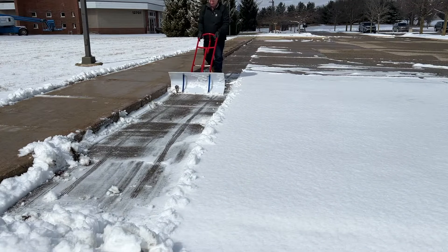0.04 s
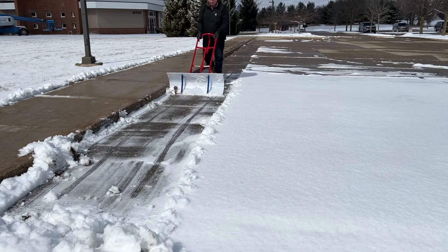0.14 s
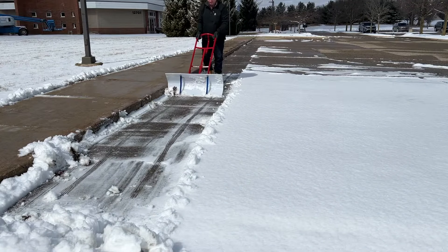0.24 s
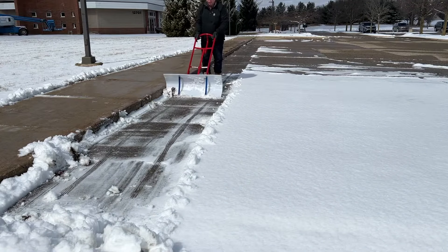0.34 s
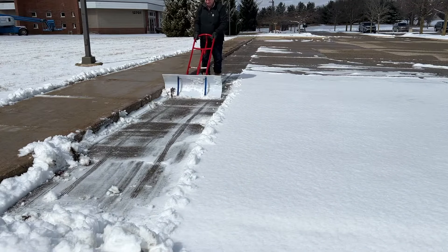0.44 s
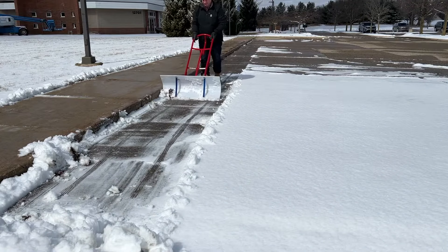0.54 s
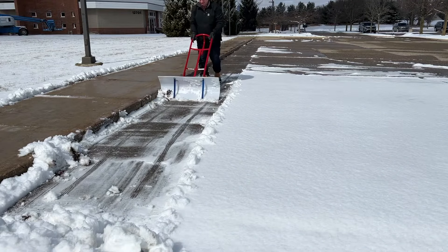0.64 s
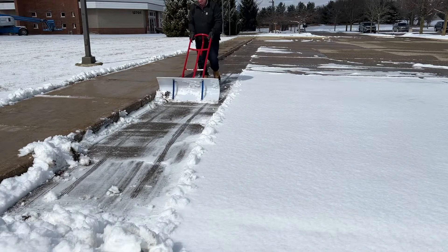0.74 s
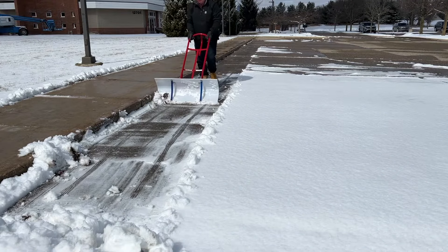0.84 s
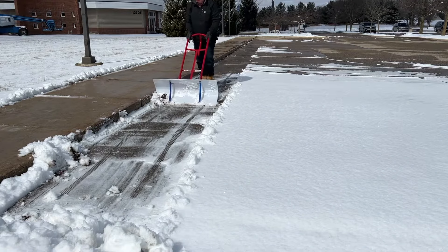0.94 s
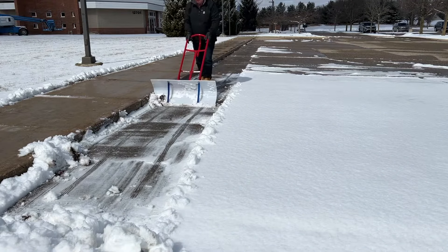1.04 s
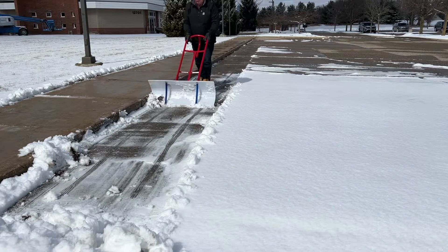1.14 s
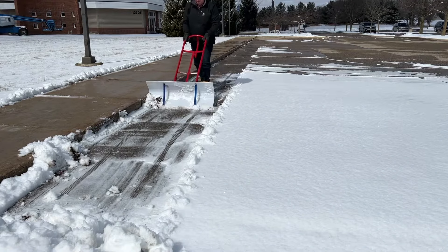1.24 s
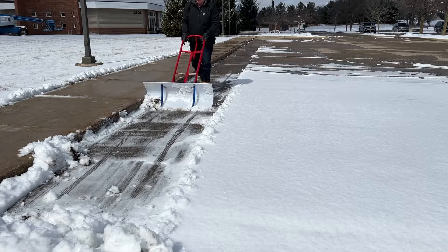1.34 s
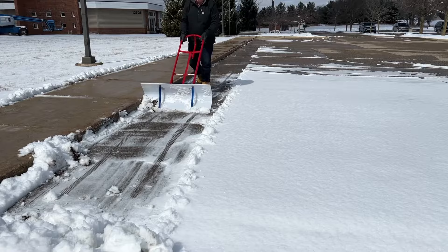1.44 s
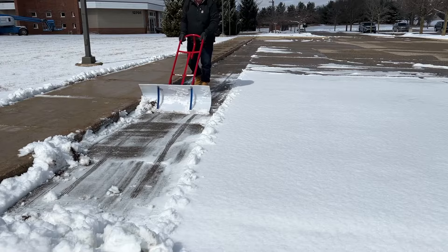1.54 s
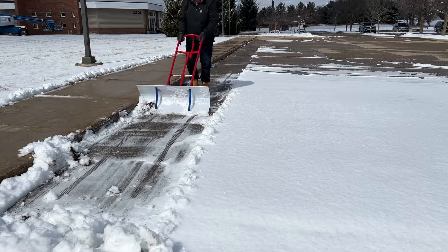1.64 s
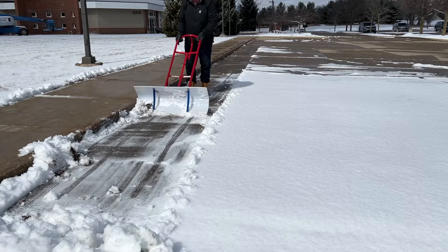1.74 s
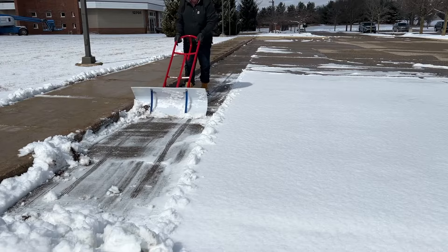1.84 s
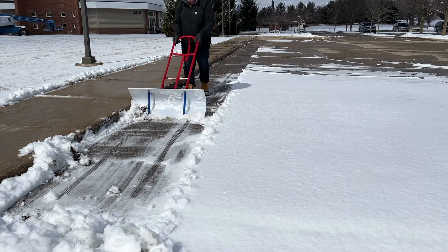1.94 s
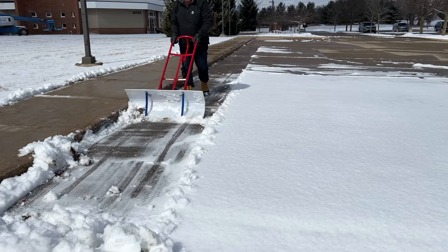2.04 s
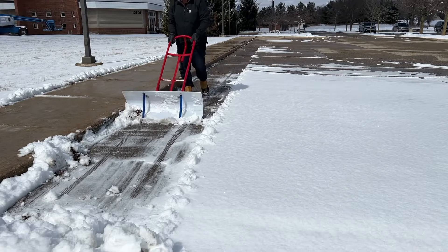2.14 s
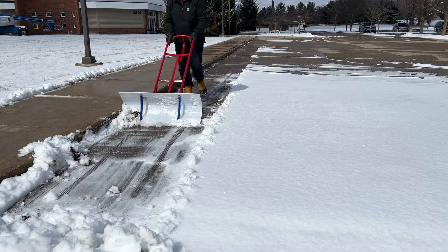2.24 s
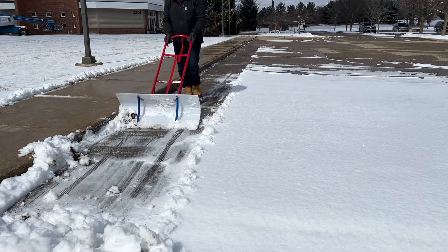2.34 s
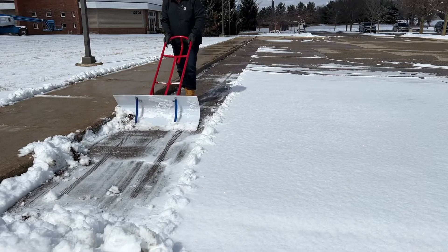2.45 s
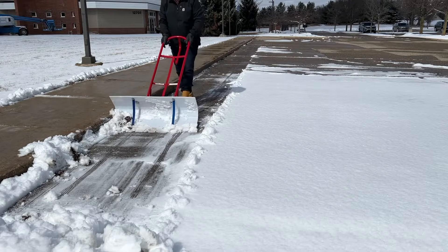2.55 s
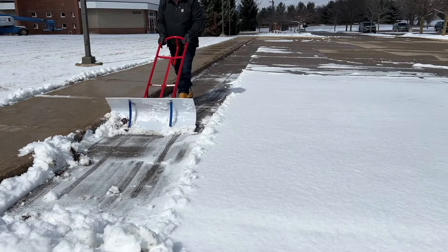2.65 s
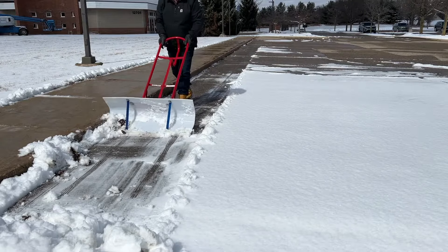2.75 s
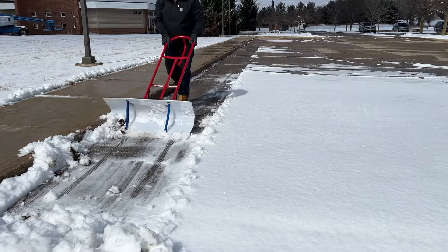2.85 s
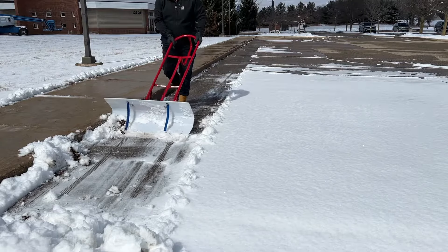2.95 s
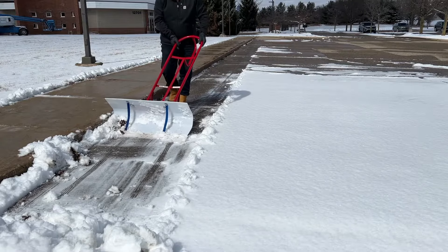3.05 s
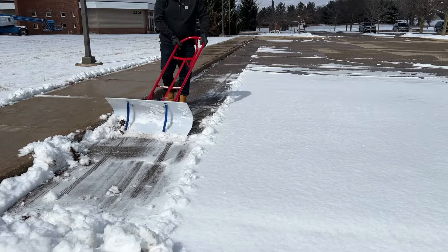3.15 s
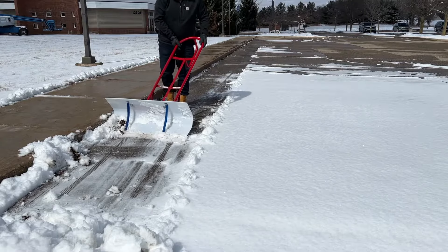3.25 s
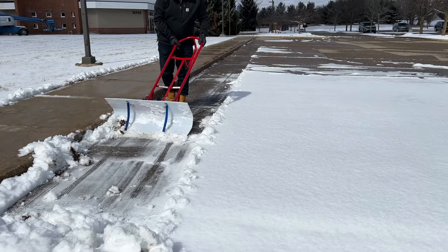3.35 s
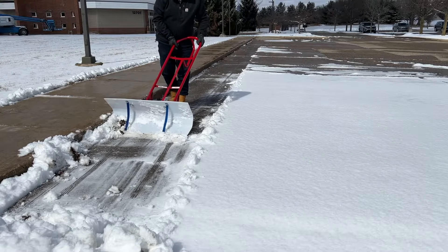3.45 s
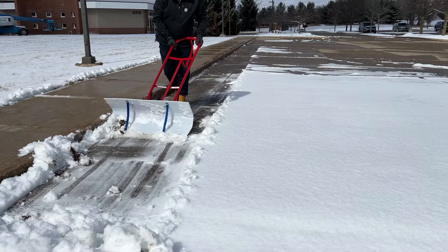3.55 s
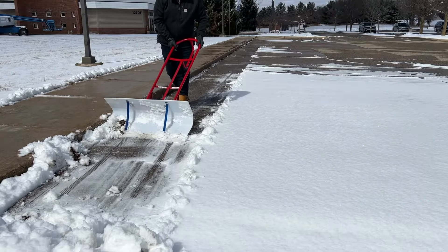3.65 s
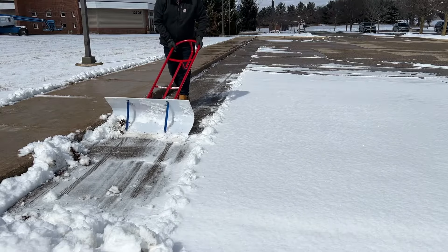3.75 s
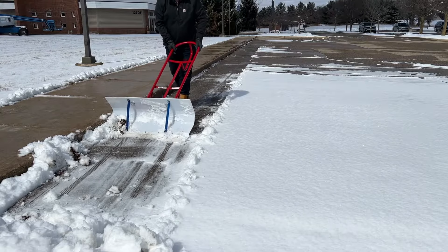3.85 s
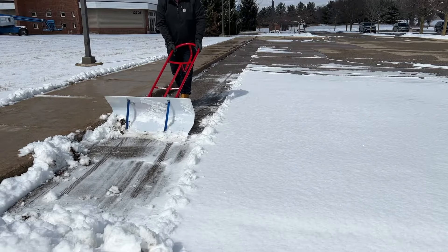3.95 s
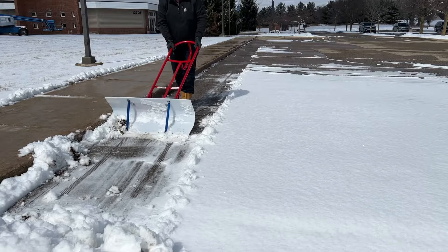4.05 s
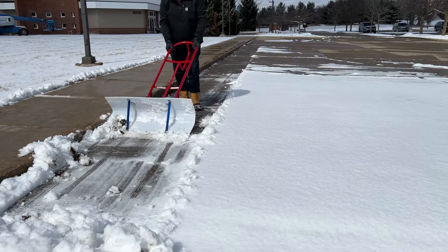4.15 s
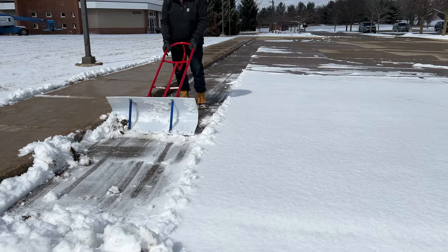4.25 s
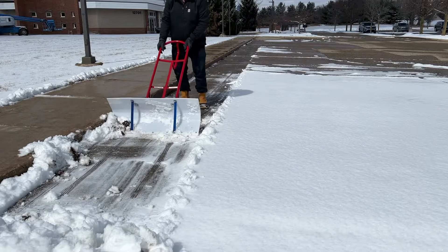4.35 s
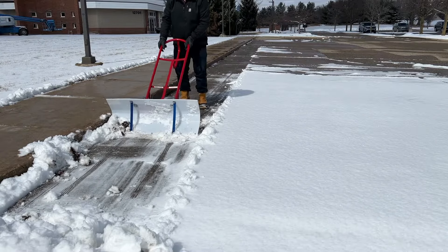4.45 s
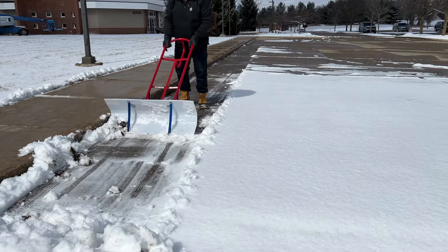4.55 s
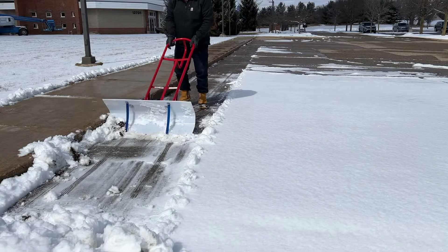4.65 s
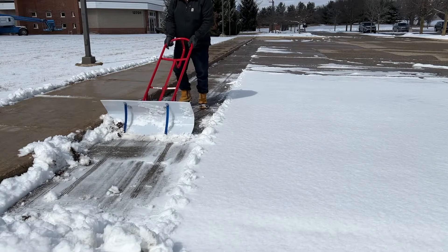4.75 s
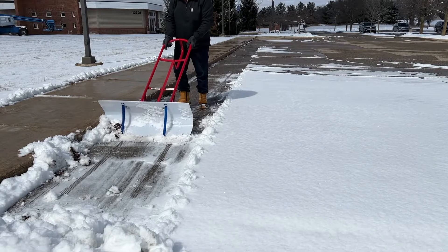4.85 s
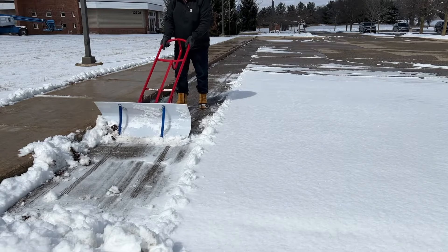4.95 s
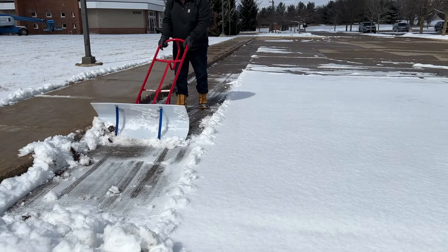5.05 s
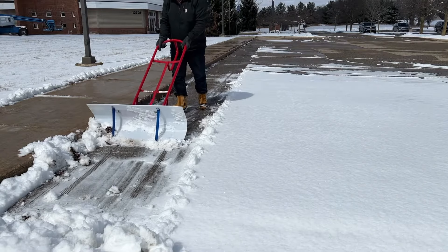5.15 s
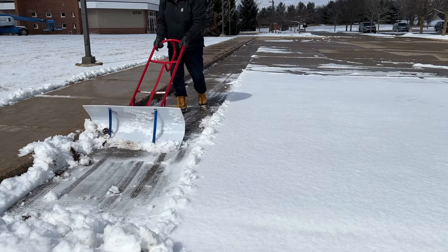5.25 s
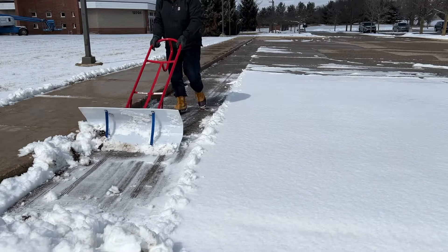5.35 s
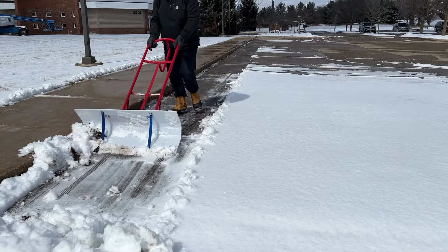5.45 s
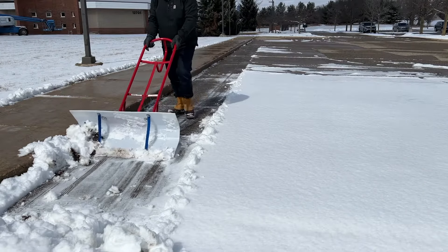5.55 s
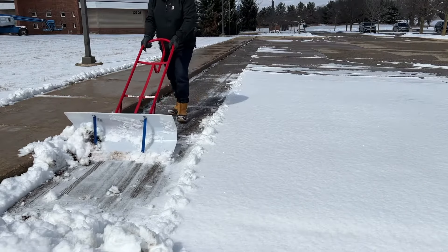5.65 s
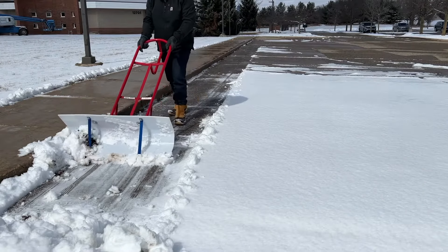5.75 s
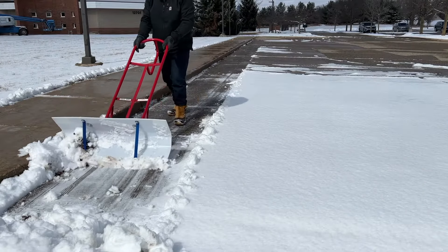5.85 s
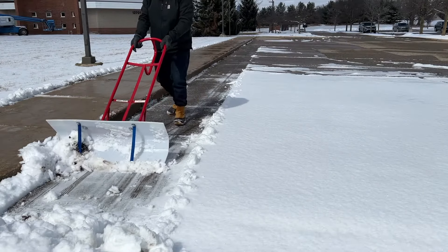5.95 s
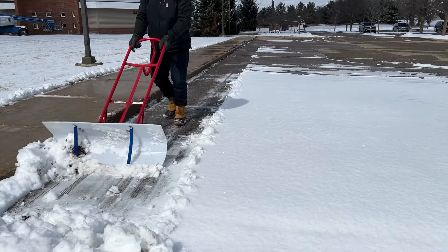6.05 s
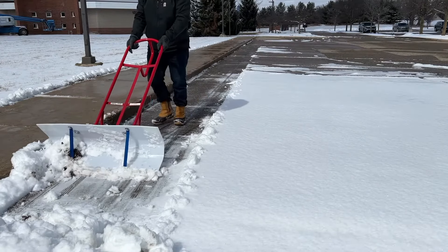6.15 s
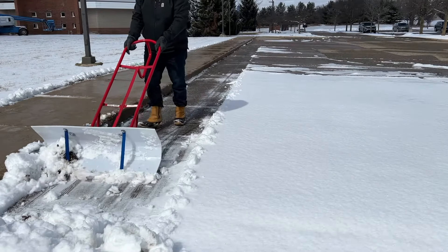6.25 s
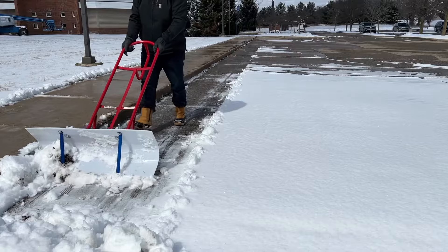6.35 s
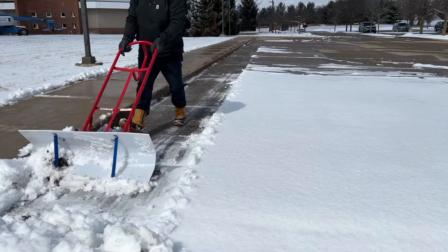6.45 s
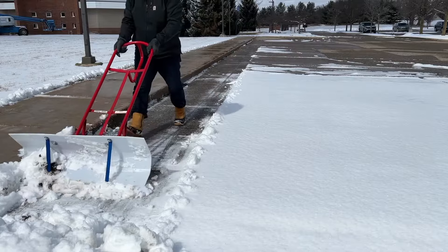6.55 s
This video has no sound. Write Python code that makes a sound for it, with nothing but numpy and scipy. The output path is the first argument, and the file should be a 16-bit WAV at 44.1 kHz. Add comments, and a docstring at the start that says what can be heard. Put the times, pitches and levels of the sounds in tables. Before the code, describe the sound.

A wide plastic snow pusher scrapes over icy concrete with gritty crackles and bumps, pauses, then scrapes again in light wind.

```python
"""Outdoors on icy concrete, a wide plastic blade on wheels is pushed closer, stops, and is pushed again.
Its edge catches on the grain of the concrete and shakes the blade, which bumps over joints and lumps.
Grit hisses, ticks and cracks with the ice under it; a few short scuffs mark the stop.
Light wind buffets and thumps the two microphones over the hum of a far road."""
import sys
import numpy as np
from scipy import signal
from scipy.fft import rfft, irfft
from scipy.io import wavfile
from scipy.ndimage import uniform_filter1d

SR = 44100
rng = np.random.default_rng(int(sys.argv[2]) if len(sys.argv) > 2 else 0)


def transcribe(u):
    """Save the signal u as a 16-bit wav file named by the first command-line argument.

    u: samples, shape (n,) or (channels, n), limited to [-1, 1]; the rate is SR.
    q: integer samples, one column per channel.
    """
    v = np.clip(np.atleast_2d(u).T, -1, 1)
    q = np.round(v * 32767).astype(np.int16)
    wavfile.write(sys.argv[1], SR, q)


N = 291060

# how hard the blade shakes through two pushes and the stop: time_s, level_db
PUSH_LEVEL = [(0, -30), (0.2, -35.5), (0.6, -26.5), (1.0, -31.5), (1.15, -27.5), (1.55, -30.5), (2.05, -25),
              (2.35, -30.5), (2.6, -27.5), (2.77, -27), (2.83, -44), (3.0, -51.5), (3.4, -63.5),
              (4.45, -63), (4.6, -46.5), (4.74, -43), (4.751, -35.5), (5.1, -31.5), (5.6, -25.5),
              (6.15, -28), (6.6, -25.5)]
# short scuffs while the blade stands: start_s, level_db, length_s, grit_offset_db
STOP_SCUFFS = [(2.848, -35, 0.16, 2), (3.152, -41, 0.11, -3), (3.836, -42, 0.11, -9), (4.231, -43, 0.27, 2)]
# grit and ice breaking under the edge: start_s, burst_drive_db, blow_drive_db
GRIT_CRACKS = [(0.139, -36, -21.5), (0.189, -23.5, -44), (0.3447, -38, -19), (0.537, -12.5, -13),
               (0.629, -51, -21.5), (0.807, -33, -14.5), (1.045, -28.5, -37), (1.136, -25, -16.5),
               (1.1905, -48, -41), (1.3102, -18, -18), (1.513, -36, -26), (1.5468, -22, -28),
               (1.5794, -23.5, -36), (1.6293, -19, -17.5), (1.6616, -26.5, -18.5), (1.7534, -23, -21.5),
               (1.8976, -10.5, -15), (1.9031, -34, -13), (1.969, -23, -14.5), (2.0014, -24.5, -21),
               (2.137, -23, -19), (2.163, -20.5, -17), (2.207, -21, -22), (2.316, -27, -20.5),
               (2.4632, -28, -20), (2.477, -45, -24), (2.544, -20, -28), (2.578, -24, -15),
               (2.5925, -23, -11.5), (2.692, -40, -11), (2.732, -23, -16.5), (2.7785, -24, -42),
               (3.619, -41, -64), (4.232, -32, -25), (4.7634, -23.5, -21.5), (5.0163, -31, -23.5),
               (5.0935, -41, -12.5), (5.1116, -22, -14.5), (5.1554, -23, -41), (5.2515, -19.5, -20),
               (5.2972, -23, -20), (5.316, -17.5, -29), (5.382, -22, -19.5), (5.458, -35, -16.5),
               (5.5161, -12.5, -5), (5.534, -28, -13.5), (5.5417, -21, -14.5), (5.575, -23, -15),
               (5.592, -32, -37), (5.7541, -17, -6.5), (5.841, -22, -11.5), (5.993, -12, -15),
               (6.12, -27, -22), (6.1879, -30.5, -22.5), (6.235, -19, -20), (6.2489, -17.5, -13),
               (6.434, -16, -14), (6.4875, -24, -22), (6.497, -17.5, -10), (6.52, -17, -11.5)]
# the blade's bumps and, deepest, wind thumps on the microphones: start_s, level_db, pitch_hz
LOW_THUDS = [(0.095, -13.5, 222), (0.24, -13, 64.5), (0.442, -10, 183), (0.45, -12.5, 55.4),
             (0.668, -10, 200), (0.772, -13.5, 378), (1.105, -2.5, 140), (1.11, -10.5, 76),
             (1.166, -9.5, 254), (1.206, -7, 201), (1.267, -8, 176), (1.331, -13, 215), (1.455, -11, 65.5),
             (1.594, -11, 330), (1.882, -21, 230), (2.432, -13, 60), (2.463, -13, 296), (2.483, -7.5, 202),
             (2.597, -7.5, 179), (2.687, -13, 333), (4.233, -20, 400), (4.259, -20.5, 253),
             (5.094, -4.5, 184), (5.382, -11.5, 330), (5.595, -13, 440), (5.68, -12.5, 234),
             (5.7645, -7.5, 507), (6.013, -22, 168), (6.106, -12, 384), (6.495, -10.5, 255)]
# low body of blade and frame: pitch_hz, width_hz, gain_db
BLADE_MODES = [(191.5, 64, 0.5), (262, 103, -1), (330.6, 31.6, -3), (402.3, 61, -7), (494.3, 55, -4),
               (568.5, 91, -5.5), (827, 112, -11.5)]
# upper ring of the edge: pitch_hz, width_hz, gain_db
EDGE_MODES = [(995, 224, 0.5), (1360, 580, -2.5), (2100, 190, -9.5), (3120, 3500, -18.5)]
# the panel's hollow answer to a sharp blow: pitch_hz, width_hz, gain_db
CLACK_MODES = [(574, 1100, 18.5), (950, 460, 16), (1638, 420, -2), (2456, 340, 0), (3170, 370, -7),
               (3750, 300, -7)]
# colour of the grit hiss: frequency_hz, gain_db
HISS_EQ = [(1500, 14.5), (3000, 12), (4200, 8), (5300, 4.5), (6400, 6), (8600, 5.5), (11500, 5),
           (13800, -5), (15400, 0)]
# colour of a crack: frequency_hz, gain_db
SNAP_EQ = [(3000, 10.5), (5100, 4), (7000, 5), (12000, 4.5), (15500, -12.5)]
# how much sooner the left microphone hears the blade: time_s, lead_us
LEFT_LEAD = [(0, 72), (2.7, 81), (4.8, 94), (6.6, 163)]
# stereo balance of the blade: frequency_hz, left_over_right_db
LEFT_LEAN = [(60, 5.5), (180, -0.5), (550, 3), (1650, 4), (4970, 6), (15000, -1)]
# left-right phase difference in the treble, which widens hiss and cracks: frequency_hz, phase_rad
TREBLE_PHASE = [(3000, -0.2), (5300, 1.6), (7800, 0.27), (11000, 3.5), (15000, -9)]
# swell of the wind: time_s, level_db
WIND_LEVEL = [(0, -33), (0.5, -35.5), (1.3, -36), (2.3, -34), (2.9, -39.5), (3.8, -33.5), (4.8, -36.5),
              (5.6, -29), (6.6, -29.5)]
# colour of the buffeting: frequency_hz, gain_db
WIND_EQ = [(34, -11), (97, 0), (117, -5.5), (136, -15.5), (260, -52), (340, -100)]
# colour of the far road: frequency_hz, gain_db
ROAD_EQ = [(88, -20), (150, -1.5), (191, -2.5), (391, -14), (632, -8.5), (1540, -11.5), (2490, -26),
           (9000, -42), (11700, -99)]
# how alike the road is left and right: frequency_hz, correlation
ROAD_LIKENESS = [(60, 0.34), (240, -0.4), (3770, 0.058), (15000, 0.59)]

SCUFF_RISE_S, SCUFF_FALL_DB = 0.014, -43
HISS_DB, HISS_PER_DB, GRIT_PIVOT_DB = -44.5, 0.75, -26.5  # the hiss follows the shaking but swings less
TICKS_PER_S, TICKS_DB, TICK_S = 90., -47.5, 0.00087
CRACK_RISE_S, CRACK_T60_S, BLOW_T60_S = 0.0013, 0.0077, 0.016  # the shove outlasts the snap
RUNUP_S, RUNUP_SHARE = 0.007, 0.07  # smaller contacts crowd in before the break
CRUNCH_T60_S, CRUNCH_SHARE, CRUNCH_GRAIN_DB = 0.095, 0.076, 6  # and sputter after it
CRACK_LUMPS_DB = 5.5  # every grain breaks with its own uneven resonances
THUD_OVERSHOOT, THUD_SETTLE_S = 0.92, 0.0023  # the pitch starts high and settles
ROAD_DB, CUT_HZ = -46, 16600


def scrape():
    """Stick and slip: clumps of catches ring the blade and stir grit. Gives mono edge and stereo hiss."""
    clumps = wander(22.4)
    level_db, grit_db = shaking_db()
    large = catches(per_s=250., spread_db=2.6) * gain_of(2.05 * clumps)
    small = catches(per_s=2500., spread_db=3.5) * gain_of(2.46 * clumps)
    body = ring(0.5 * unit_rms(large) + unit_rms(small), BLADE_MODES, scatter_db=1.0)
    rasp = ring(0.67 * unit_rms(large) + unit_rms(small), EDGE_MODES, scatter_db=4.5)
    blade = unit_rms(unit_rms(body) + gain_of(-12.5) * unit_rms(rasp))
    hiss = grit_hiss(large, clumps, grit_db)
    edge = gain_of(level_db) * thud_swell() * blade + hiss[0] + grit_ticks(grit_db)
    return edge, 0.61 * hiss[1:]


def shaking_db():
    """Two envelopes, for blade and grit: the push plus scuffs that rise fast and die away."""
    t = np.arange(N) / SR
    power = gain_of(envelope(PUSH_LEVEL)) ** 2 * np.ones((2, 1))
    for start_s, level_db, length_s, grit_offset_db in STOP_SCUFFS:
        age = np.maximum(t - start_s, 0)
        attack = np.minimum(age / SCUFF_RISE_S, 1)
        scuff = attack * gain_of(level_db + SCUFF_FALL_DB * (age / length_s) ** 2)
        power += (scuff * gain_of([[0], [grit_offset_db]])) ** 2
    return 10 * np.log10(power)


def catches(per_s, spread_db):
    """The edge snags on the grain: sparse clicks of random sign, a few of them large."""
    size = gain_of(spread_db * np.minimum(rng.exponential(1, N), 3))
    return size * rng.choice([-1., 1.], N) * (rng.random(N) < per_s / SR)


def ring(drive, modes, scatter_db=0.):
    """Rings the plastic; scatter strikes each mode unevenly, as the contact wanders along the edge."""
    out = np.zeros(N)
    for k, (hz, width_hz, gain_db) in enumerate(modes):
        radius, angle = np.exp(-np.pi * width_hz / SR), 2 * np.pi * hz / SR
        gain = (-1) ** k * gain_of(gain_db) * np.sin(angle) * np.sqrt(width_hz / 100)
        strike = drive * gain_of(scatter_db * wander(49.0)) if scatter_db else drive
        out += signal.lfilter([0, gain], [1, -2 * radius * np.cos(angle), radius ** 2], strike)
    return out


def thuds():
    """Short low thuds of a few damped cycles: the blade's bumps and, deepest, wind on the microphones."""
    out, t = np.zeros(N), np.arange(5000) / SR
    bent_time = t + THUD_OVERSHOOT * THUD_SETTLE_S * (1 - np.exp(-t / THUD_SETTLE_S))
    for start_s, level_db, hz in LOW_THUDS:
        attack = np.minimum(t * hz / 0.42, 1)
        t60_s = 0.0084 + 4.5 / hz
        thud = gain_of(level_db - 60 * t / t60_s) * attack * np.sin(2 * np.pi * hz * bent_time)
        slot = out[round(start_s * SR):][:len(t)]
        slot += thud[:len(slot)]
    return out


def thud_swell():
    """The scrape swells for a moment at each thud."""
    t = np.arange(N) / SR
    ages = (np.maximum(t - start_s, 0) for start_s, _, _ in LOW_THUDS)
    return 1 + sum(1.78 * age / 0.01 * np.exp(-age / 0.0095) for age in ages)


def cracks():
    """Grit and ice break: a bright snap amid smaller contacts, and a blow that makes the blade clack."""
    bursts, blows = np.zeros(N), np.zeros(N)
    t = (np.arange(2560) - 768) / SR  # zero at the break
    age = np.maximum(t, 0)
    attack = np.minimum(age / CRACK_RISE_S, 1) ** 2
    snap = attack * gain_of(-60 * age / CRACK_T60_S)
    shove = attack * gain_of(-60 * age / BLOW_T60_S)
    runup = RUNUP_SHARE * np.exp(np.minimum(t, 0) / RUNUP_S)
    contacts = np.where(t < 0, runup, CRUNCH_SHARE * gain_of(-60 * age / CRUNCH_T60_S))
    for start_s, burst_db, blow_db in GRIT_CRACKS:
        burst_noise, blow_noise, lump_noise, grain_noise = rng.standard_normal((4, len(t)))
        ripple = uniform_filter1d(uniform_filter1d(lump_noise[:len(t) // 2 + 1], size=30), size=30)
        resonances = unit_rms(gain_of(CRACK_LUMPS_DB * unit_rms(ripple)))
        grain = gain_of(CRUNCH_GRAIN_DB * unit_rms(uniform_filter1d(grain_noise, size=60)))
        crunch = contacts * unit_rms(grain)
        burst = irfft(rfft(burst_noise) * resonances) * (snap + crunch)
        blow = blow_noise * (shove + crunch)
        at = round((start_s + t[0]) * SR)
        bursts[at:at + len(t)] += gain_of(burst_db) * burst
        blows[at:at + len(t)] += gain_of(blow_db) * blow / np.linalg.norm(blow)
    blows = filtered(blows, 150., "high")
    clack = 0.071 * ring(blows, BLADE_MODES[2:]) + 0.24 * ring(blows, CLACK_MODES)
    return equalised(bursts, SNAP_EQ) + clack


def grit_hiss(large_catches, clumps, grit_db):
    """Grit hisses under the edge and each large catch throws a puff. Rows: centre, left, right."""
    pole = np.exp(-1 / (0.00014 * SR))
    puffs = signal.lfilter([1], np.convolve([1, -pole], [1, -pole]), large_catches ** 2)
    sputter = gain_of(0.93 * clumps) + 0.2 * unit_rms(puffs)
    hiss = equalised(rng.standard_normal((3, N)) * sputter, HISS_EQ)
    level = gain_of(HISS_DB + HISS_PER_DB * (grit_db - GRIT_PIVOT_DB))
    return level * thud_swell() * hiss / np.std(hiss)


def grit_ticks(grit_db):
    """Small grains pop in tiny noise bursts: coarse ones in the mids, fine ones in the treble."""
    out, t = np.zeros(N), np.arange(400) / SR
    for band_hz in [(1500, 3700), (3500, 10800)]:
        grains = abs(catches(TICKS_PER_S / 2, spread_db=3.))
        pops = signal.oaconvolve(grains, t * np.exp(-t / TICK_S))[:N]
        out += unit_rms(filtered(pops * rng.standard_normal(N), band_hz, "band"))
    return gain_of(TICKS_DB + grit_db - GRIT_PIVOT_DB) * unit_rms(out)


def placed_left(x):
    """The blade reaches the left microphone first, and louder in most bands."""
    hz, t, spectrum = signal.stft(x, SR, nperseg=512)
    lead_s = 1e-6 * np.interp(t, *np.transpose(LEFT_LEAD))
    lead_fade = 1 / (1 + (hz / 3880.0) ** 6)  # the lead drops out in the treble
    phase = 2 * np.pi * np.outer(hz * lead_fade, lead_s) + curve_at(TREBLE_PHASE, hz)[:, None]
    half_pan = np.exp(.5j * phase) * gain_of(curve_at(LEFT_LEAN, hz) / 2)[:, None]
    pair = np.array([spectrum * half_pan, spectrum / half_pan])
    return signal.istft(pair, SR, nperseg=512)[1][:, :N]


def reflections(x, level_db=-11.0, t60_s=0.054):
    """Short echoes off ground and snow banks, a separate set for each side."""
    taps = rng.standard_normal((2, 3000)) * (rng.random((2, 3000)) < .1)
    taps *= gain_of(-60 * np.arange(3000) / SR / t60_s)
    taps /= np.linalg.norm(taps, axis=1, keepdims=True)
    delayed = np.pad(taps, ((0, 0), (60, 0)))
    return gain_of(level_db) * signal.oaconvolve(x[None], delayed, axes=1)[:, :N]


def wind():
    """Lumpy low buffeting, partly shared by the two microphones."""
    shared, apart = rng.standard_normal(N), rng.standard_normal((2, N))
    lumps = gain_of(2.7 * wander(13.5))
    buffeting = equalised((shared + 1.27 * apart) * lumps, WIND_EQ)
    return gain_of(envelope(WIND_LEVEL)) * unit_rms(buffeting)


def road():
    """A smooth bed of far road hum, with faint patches drifting through its spectrum."""
    frames, hz = N // 256 + 5, np.fft.rfftfreq(1024, 1 / SR)
    left_re, left_im, apart_re, apart_im, patches = rng.standard_normal((frames, len(hz), 5)).T
    patches = uniform_filter1d(patches, size=12, axis=0)  # across frequency
    patches = unit_rms(uniform_filter1d(patches, size=16, axis=1))  # across time
    likeness = curve_at(ROAD_LIKENESS, hz)[:, None]
    left = left_re + 1j * left_im
    right = likeness * left + np.sqrt(1 - likeness ** 2) * (apart_re + 1j * apart_im)
    spectra = np.array([left, right]) * gain_of(curve_at(ROAD_EQ, hz)[:, None] + 1.4 * patches)
    hum = signal.istft(spectra, nperseg=1024, noverlap=768)[1][:, :N]
    return gain_of(ROAD_DB) * unit_rms(hum)


def gain_of(db):
    """Decibels to gain."""
    return 10 ** (np.asarray(db) / 20)


def unit_rms(x):
    """Scales to rms 1."""
    return x / np.sqrt(np.mean(x ** 2) + 1e-20)


def envelope(rows):
    """Draws a time_s, value table at every sample."""
    return np.interp(np.arange(N) / SR, *np.transpose(rows))


def curve_at(points, hz):
    """Reads a frequency_hz, value table on a log-frequency axis."""
    point_hz, value = np.transpose(points)
    return np.interp(np.log(hz + 1), np.log(point_hz + 1), value)


def equalised(x, points):
    """Applies a frequency_hz, gain_db curve."""
    return irfft(rfft(x) * gain_of(curve_at(points, np.fft.rfftfreq(N, 1 / SR))), N)


def filtered(x, hz, kind):
    """A gentle low, high or band pass."""
    return signal.sosfilt(signal.butter(2, hz, kind, fs=SR, output="sos"), x)


def wander(hz):
    """Random modulation of rms 1, rolling off above hz."""
    return unit_rms(filtered(rng.standard_normal(N), hz, "low"))


def scene():
    """Scrape, cracks and thuds to the left, the wide edge's hiss around them, wind and road behind."""
    edge, wide_hiss = scrape()
    foreground = edge + cracks() + thuds()
    return placed_left(foreground) + reflections(foreground) + wide_hiss + wind() + road()


def record(dry):
    """The microphones' low cut and the band limit."""
    band_limit = signal.firwin(511, CUT_HZ, window=("kaiser", 9), fs=SR)
    return signal.oaconvolve(filtered(dry, 38., "high"), band_limit[None], "same")


dry = scene()
out = record(dry)
transcribe(out)
```